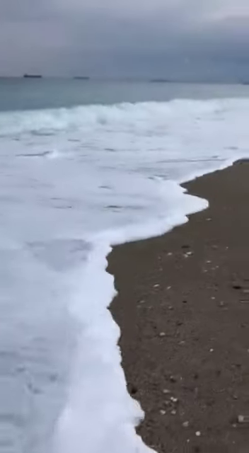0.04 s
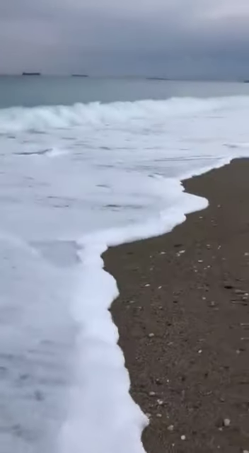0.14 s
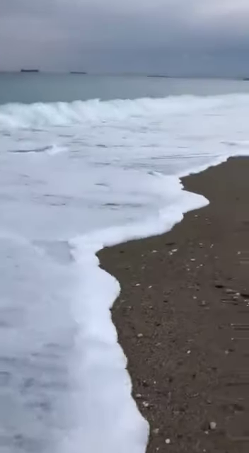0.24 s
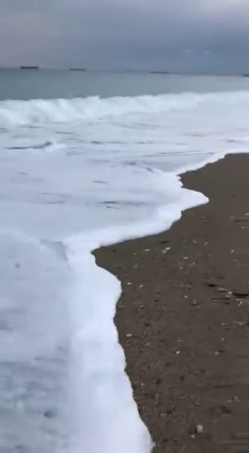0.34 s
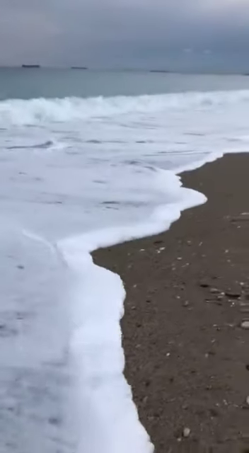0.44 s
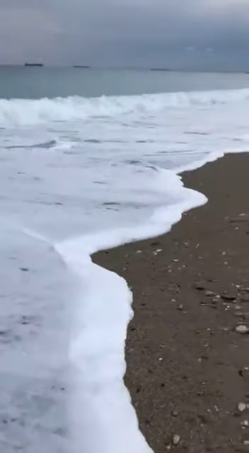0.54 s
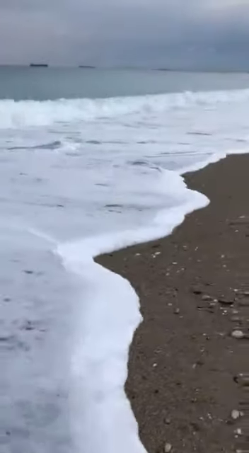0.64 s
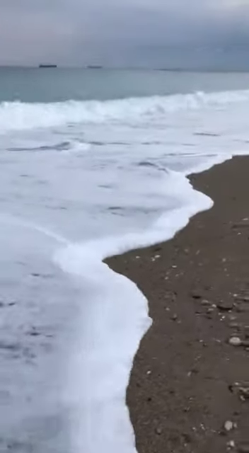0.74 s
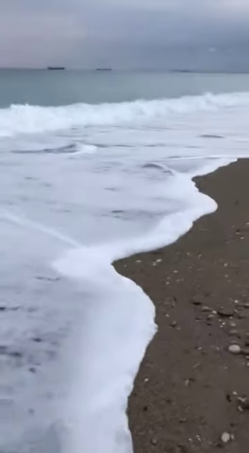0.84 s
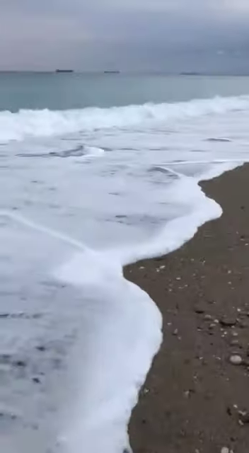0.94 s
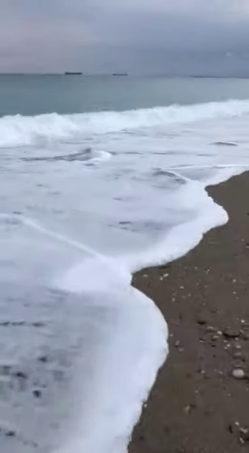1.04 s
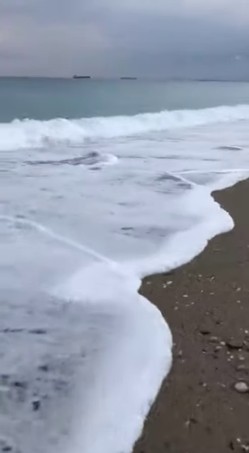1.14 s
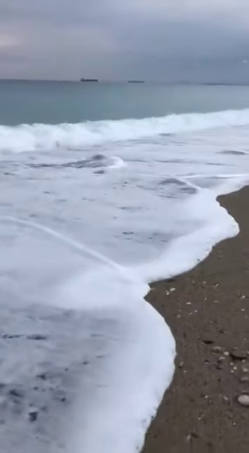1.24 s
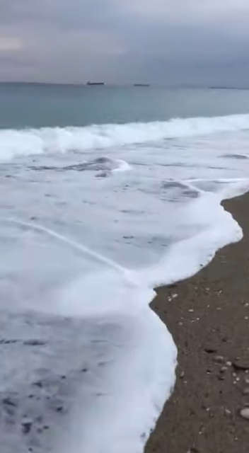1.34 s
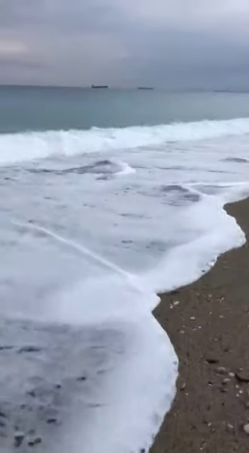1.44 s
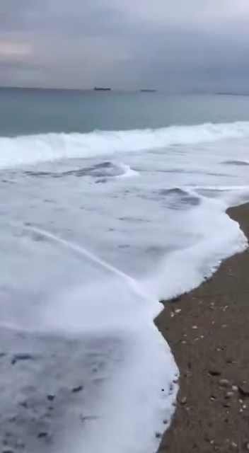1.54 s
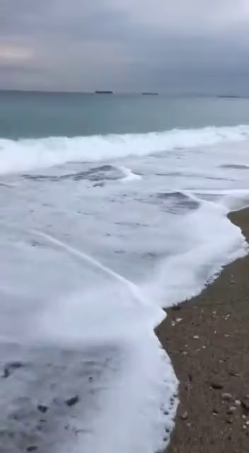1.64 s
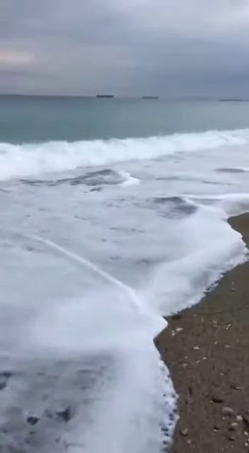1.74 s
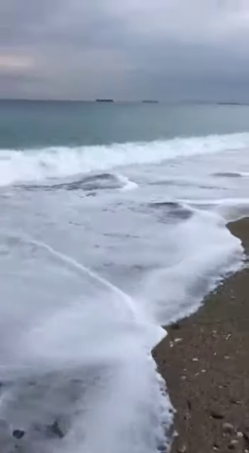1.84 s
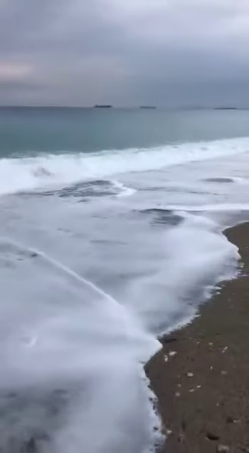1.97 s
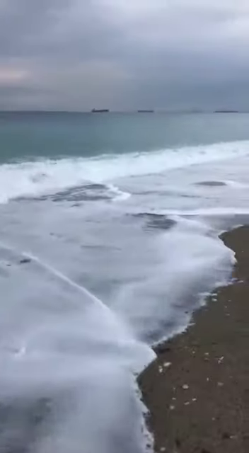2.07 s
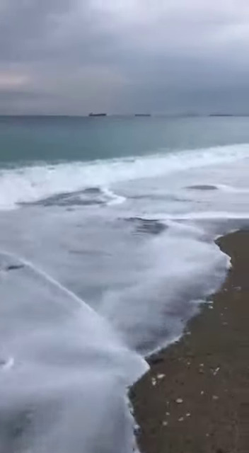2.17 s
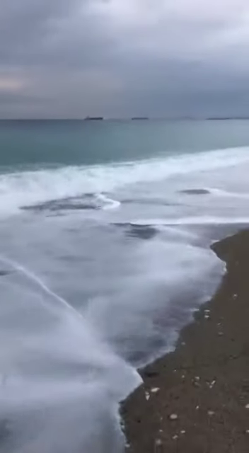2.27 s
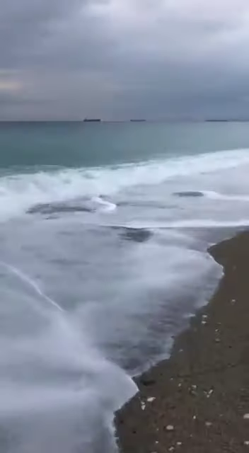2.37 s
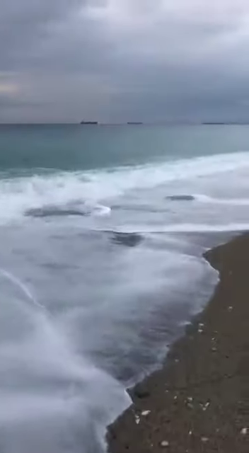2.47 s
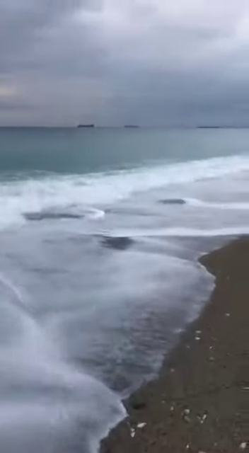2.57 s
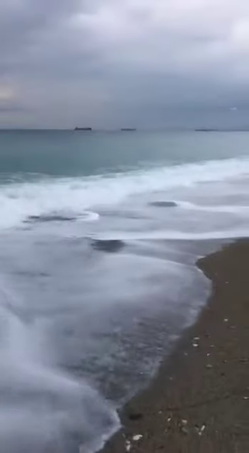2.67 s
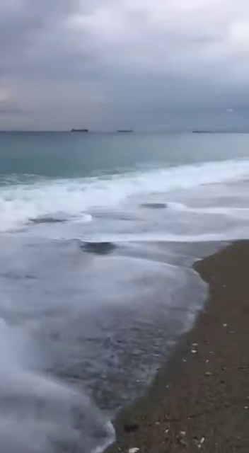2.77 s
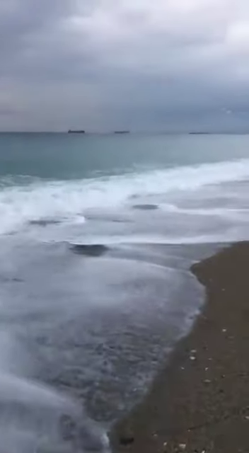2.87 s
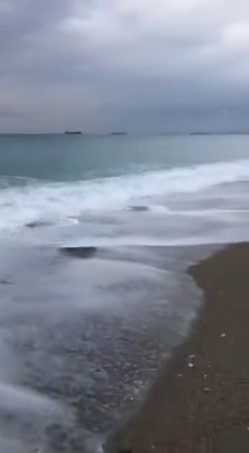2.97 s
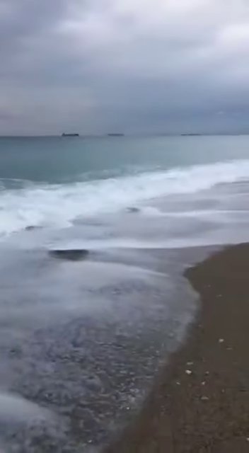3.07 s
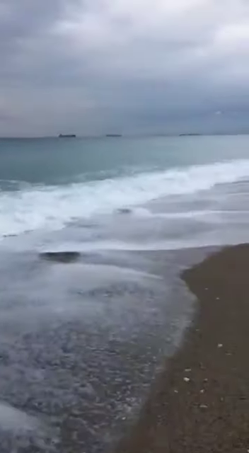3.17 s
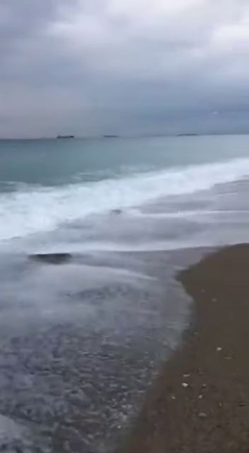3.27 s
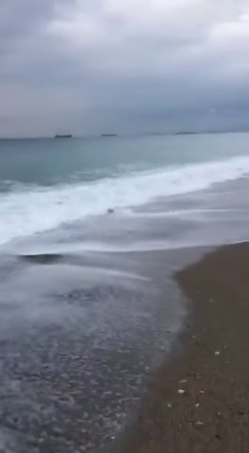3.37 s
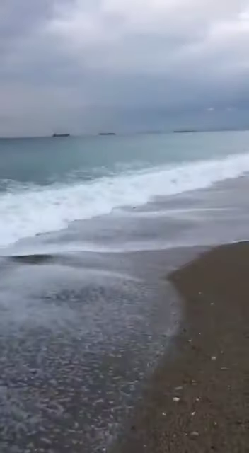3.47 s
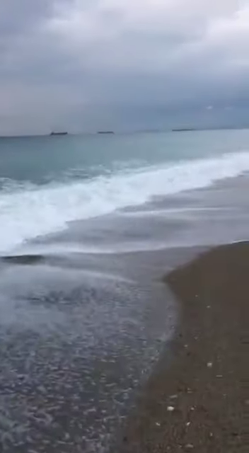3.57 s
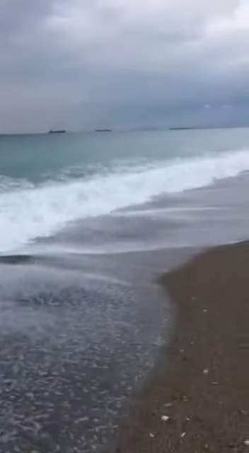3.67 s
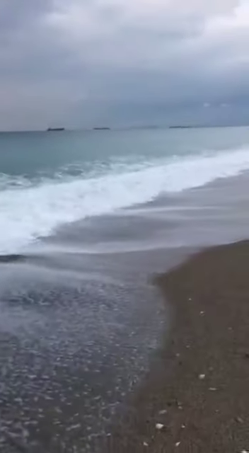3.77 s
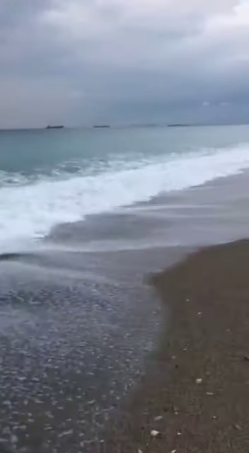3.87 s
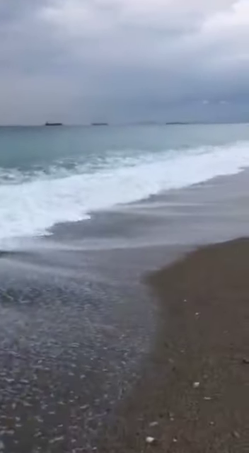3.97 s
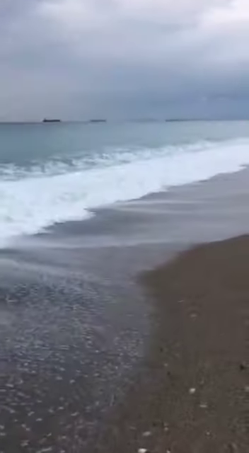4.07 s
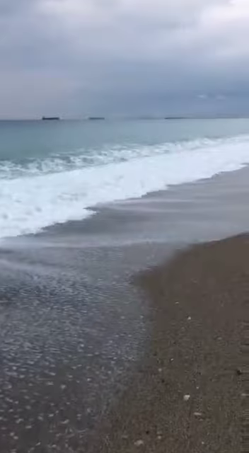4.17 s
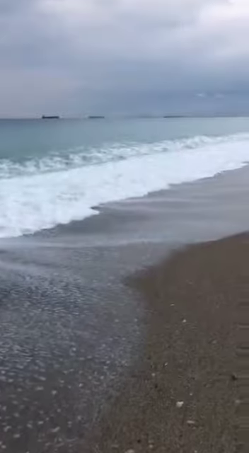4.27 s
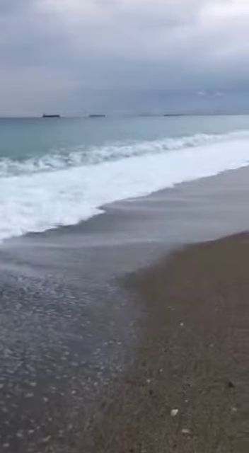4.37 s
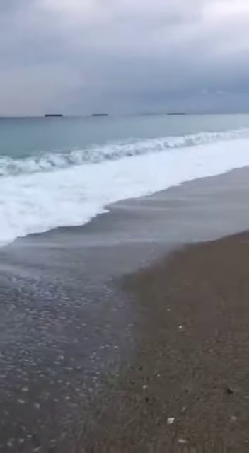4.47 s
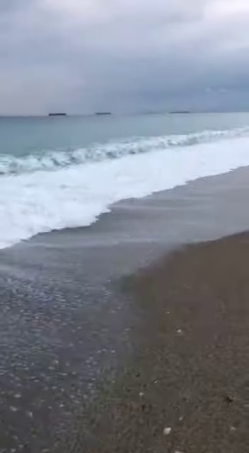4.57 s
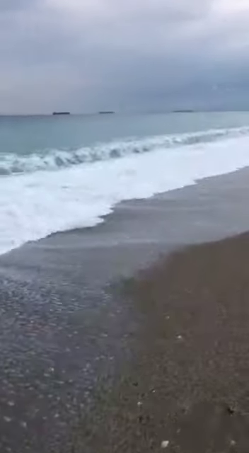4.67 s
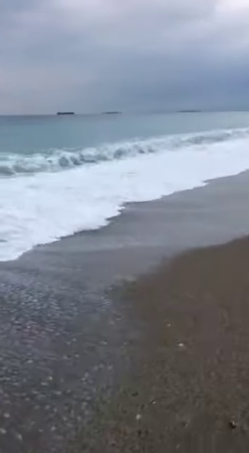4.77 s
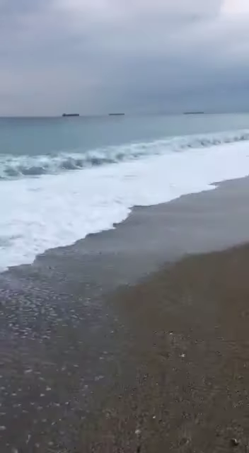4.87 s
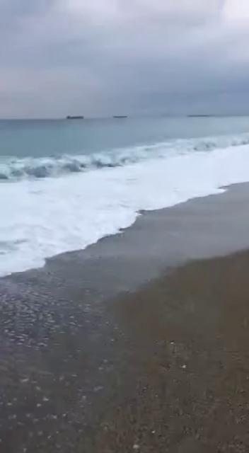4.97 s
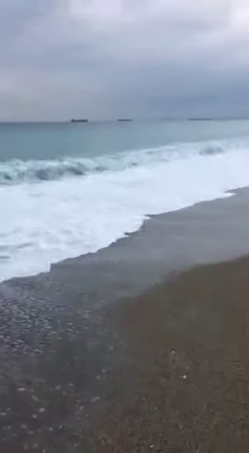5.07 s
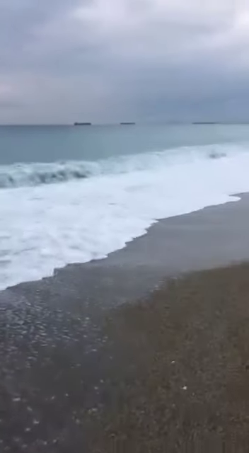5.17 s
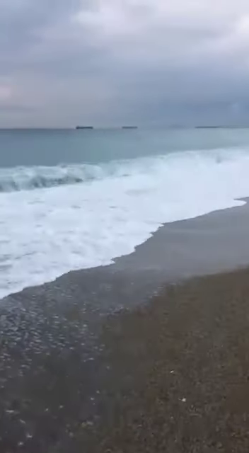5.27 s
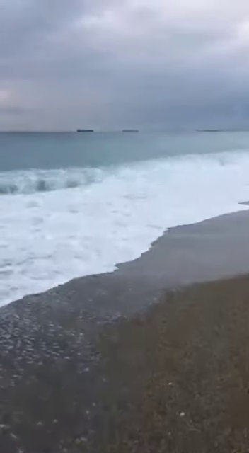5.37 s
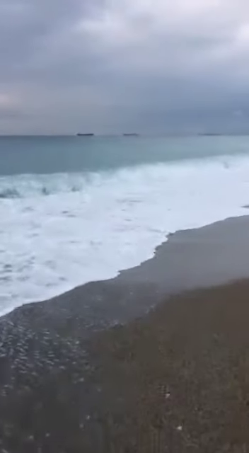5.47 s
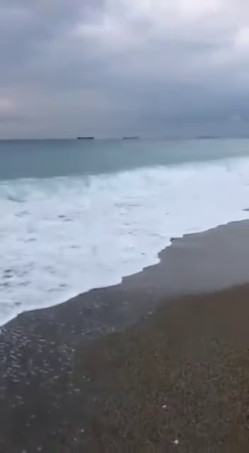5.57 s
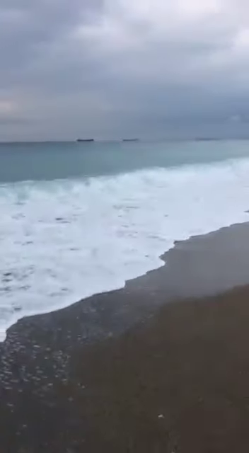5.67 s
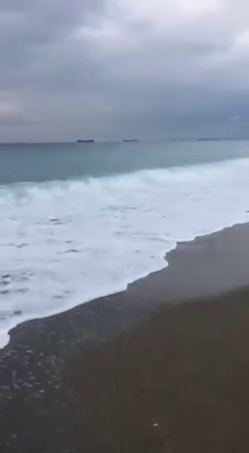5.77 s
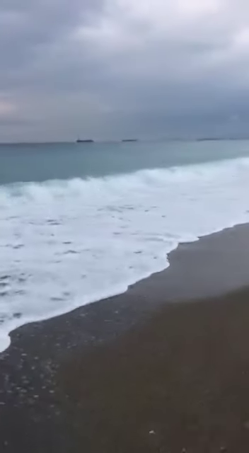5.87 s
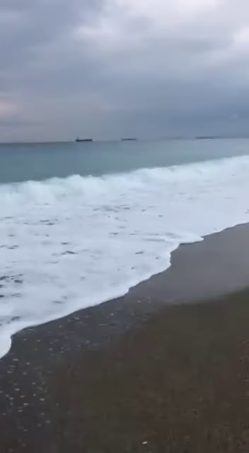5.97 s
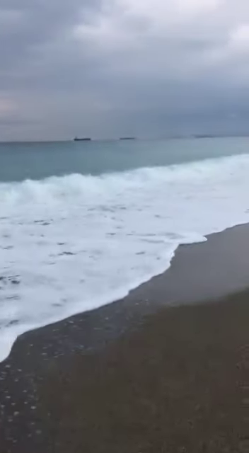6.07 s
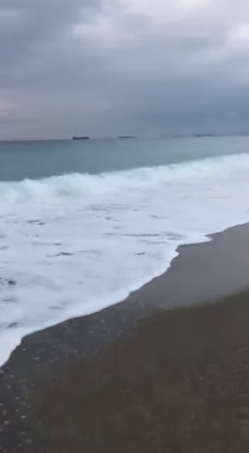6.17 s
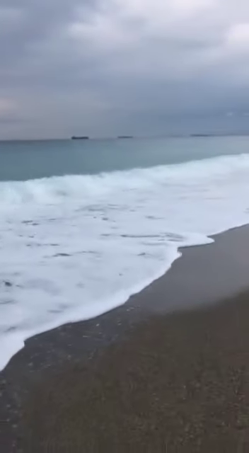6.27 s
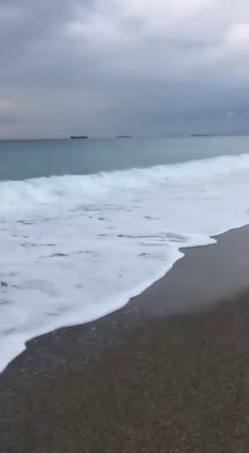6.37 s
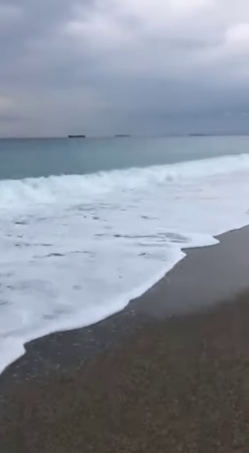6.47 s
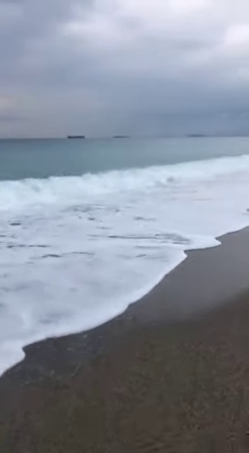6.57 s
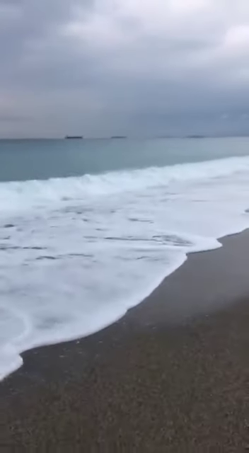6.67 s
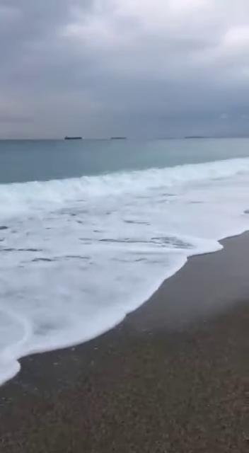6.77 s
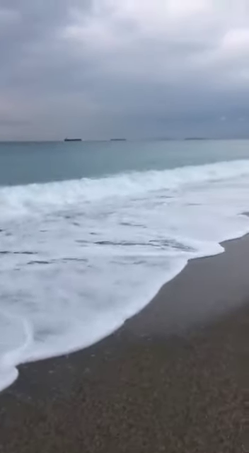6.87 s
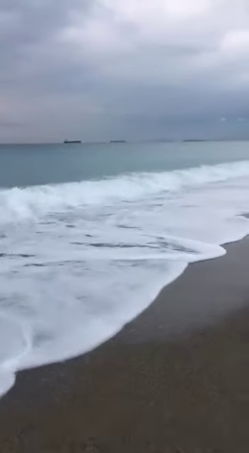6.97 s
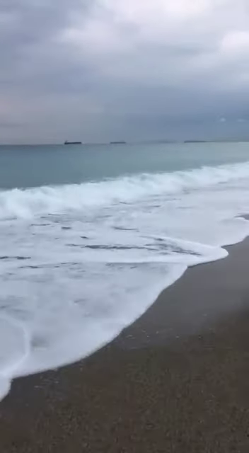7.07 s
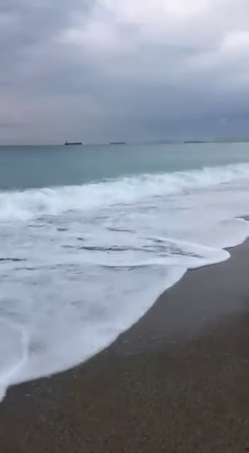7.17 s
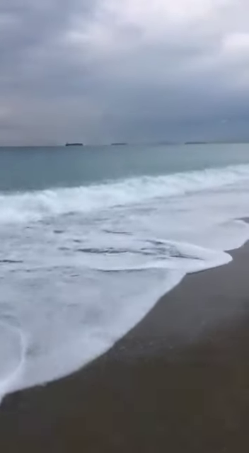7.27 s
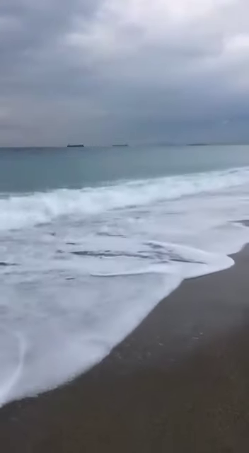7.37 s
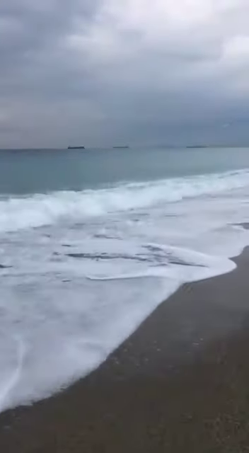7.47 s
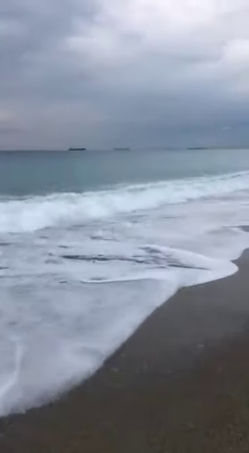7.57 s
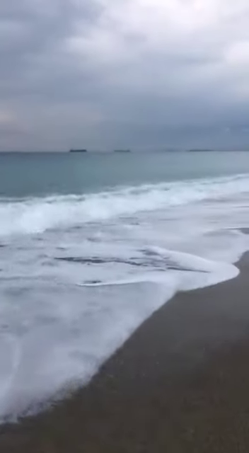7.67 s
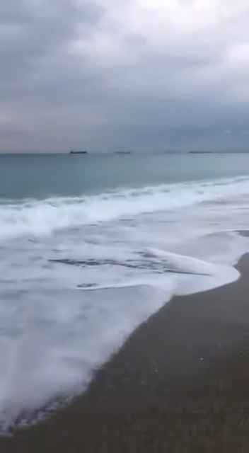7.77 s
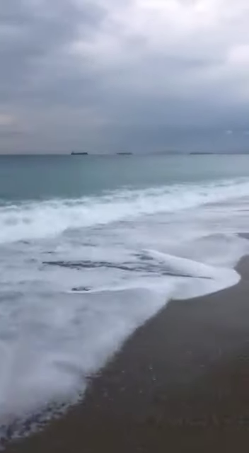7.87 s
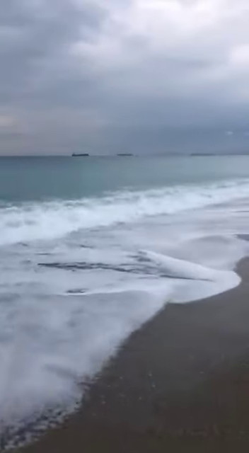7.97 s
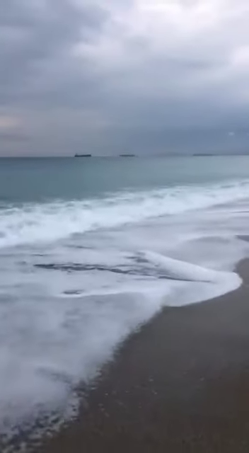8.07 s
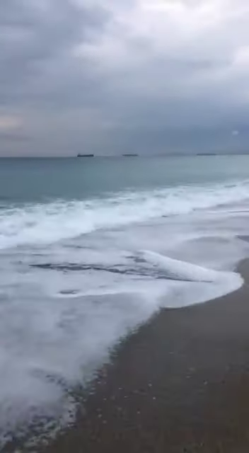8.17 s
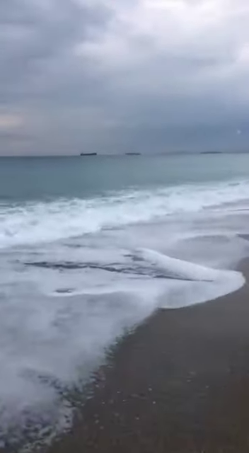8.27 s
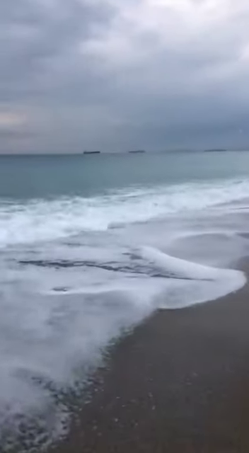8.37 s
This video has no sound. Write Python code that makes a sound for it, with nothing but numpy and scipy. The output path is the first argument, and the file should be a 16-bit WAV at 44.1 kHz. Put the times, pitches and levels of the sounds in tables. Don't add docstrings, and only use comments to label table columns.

```python
import sys
import numpy as np
from scipy import signal
from scipy.fft import rfft, irfft
from scipy.io import wavfile
from scipy.ndimage import uniform_filter1d

SR = 44100
rng = np.random.default_rng(int(sys.argv[2]) if len(sys.argv) > 2 else 0)


def file_out(sig):
    cols = np.atleast_2d(sig).T
    lim = np.clip(cols, -1, 1)
    pcm = np.round(lim * 32767).astype(np.int16)
    wavfile.write(sys.argv[1], SR, pcm)


def volts_from_decibels(level):
    exponent = np.asarray(level, float) / 20
    return 10 ** exponent


N = 371322

# (time [s], level of the fizz [dB])
FOAM_COVER = [(0, -37), (.5, -36.5), (.95, -34.5), (1.2, -39), (1.9, -39), (2.7, -42), (3.5, -44.5),
              (3.85, -43.5), (4.8, -46), (5.3, -45), (5.45, -43), (5.7, -39.5), (5.9, -36), (6.2, -36.5),
              (6.35, -38), (6.8, -37.5), (7.6, -39), (8.42, -40.5)]


def evened(x):
    return x / np.sqrt(np.mean(x ** 2) + 1e-20)


def read(points, hz):
    f, value = np.transpose(points)
    return np.interp(np.log(hz + 1), np.log(f + 1), value)


def along(curve):
    return np.interp(np.arange(N) / SR, *np.transpose(curve))


def behind(x, lag_s):
    r = np.exp(-1 / (lag_s * SR))
    return x[0] + signal.lfilter([1 - r], [1, -r], x - x[0])


def lifts_db(events):
    t = np.arange(N) / SR
    total_db = 0
    for start_s, db, rise_s, decay_s in events:
        onset = np.clip((t - start_s) / rise_s + 1, 0, 1)
        fade = np.exp(-np.maximum(t - start_s, 0) / decay_s)
        total_db = total_db + db * fade * onset
    return total_db


def water(colour, size, patchy_db, flicker_db, tilt=((0, 0), (9, 0)), pivot=5000):
    hop = size // 4
    frames, hz = N // hop + 5, np.fft.rfftfreq(size, 1 / SR)
    real, imaginary, patches = rng.standard_normal((frames, len(hz), 3)).T

    wide, long = max(size // 64, 1), max(4096 // hop, 1)
    patches = uniform_filter1d(patches, wide, 0)
    patches = evened(uniform_filter1d(patches, long, 1))
    flicker = evened(uniform_filter1d(rng.standard_normal(frames), size=5))

    slope = np.interp(np.arange(frames) * hop / SR, *np.transpose(tilt))
    octaves = np.log2(np.maximum(hz / pivot, .3))
    field_db = read(colour, hz)[:, None] + np.outer(octaves, slope)
    field_db = field_db + patchy_db * patches + flicker_db * flicker
    spectra = (real + 1j * imaginary) * volts_from_decibels(field_db)
    return evened(signal.istft(spectra, nperseg=size, noverlap=size - hop)[1][:N])


def breaker():
    # (time [s], level of the roar [dB])
    surf = [(0, -26.5), (.65, -25), (1.1, -24), (1.5, -25.5), (2.2, -26.5), (2.6, -28), (3, -32.5),
            (3.6, -32.5), (4.3, -37), (4.95, -41.5), (5.12, -39), (5.3, -35), (5.85, -29.5), (6.5, -27),
            (7, -28), (7.5, -25), (8, -27.5), (8.42, -29)]
    # (frequency [Hz], level [dB])
    boom_colour = [(18, -54), (24, -42), (32, -31), (45, -14), (65, -2.5), (100, -2), (140, -0.5),
                   (190, -11), (300, -36.5)]
    roar_colour = [(80, -35), (120, -11.5), (150, -2), (195, -0.5), (300, -4), (420, -5.5), (560, -9),
                   (660, -13.5), (850, -41.5)]
    churn_colour = [(450, -52), (620, -5.5), (720, -2.5), (900, -3.5), (1200, -7), (1700, -13), (2300, -19),
                    (3200, -33), (5000, -56)]
    # (time [s], tilt of the roar [dB per octave])
    roar_tilt = [(0, 1.4), (.5, -0.3), (2.1, -0.23), (3.2, 1.6), (3.9, 1.9), (4.6, -0.53), (5.2, 1.3),
                 (5.5, -0.18), (6.3, -0.13), (6.8, -0.84), (8.42, -0.94)]
    # (time [s], gain of the boom [dB], rise [s], decay [s])
    thumps = [
        (1.25, 4, .1, .25),
        (5.5, 1.5, .1, .15),
        (6.65, 1.5, .1, .2),
    ]
    # (time [s], gain of the roar [dB], rise [s], decay [s])
    plunges = [
        (.25, 4, 0.046, 0.045),
        (1.2, -2.5, .03, 0.1),
        (5.2, 1.5, .02, 0.087),
        (6.2, 1, 0.034, 0.053),
    ]
    # (time [s], gain of the churn [dB], rise [s], decay [s])
    sprays = [
        (1.7, 1, 0.27, 0.39),
        (3.5, 3, .25, 0.37),
        (4.15, 2.5, 0.23, .25),
        (5.98, 3.5, .25, 0.11),
        (7.3, 2, .6, 1.5),
    ]

    full_db = -26
    force_db = along(surf) - full_db

    boom_db = -33 + 1.01 * force_db - 0.5 * along(roar_tilt)
    boom_db += 0.47 * np.maximum(force_db - behind(force_db, lag_s=0.43), 0)
    boom = water(boom_colour, size=4096, patchy_db=-0.23, flicker_db=-0.4)
    boom = volts_from_decibels(boom_db + lifts_db(thumps)) * boom

    roar = water(roar_colour, size=1024, patchy_db=-0.08, flicker_db=0.5, tilt=roar_tilt, pivot=287)
    roar = volts_from_decibels(full_db + force_db + lifts_db(plunges)) * roar

    whitewater = volts_from_decibels(-37.5 + 0.94 * behind(force_db, lag_s=0.62))
    foam_churn = volts_from_decibels(along(FOAM_COVER) - 11)
    churn = water(churn_colour, size=512, patchy_db=0.23, flicker_db=0.67)
    churn = np.hypot(whitewater, foam_churn) * volts_from_decibels(lifts_db(sprays)) * churn
    return boom + roar + churn


def bubbles(per_s, low_hz, high_hz, turns, spread_db):
    strength = volts_from_decibels(spread_db * np.minimum(rng.exponential(1, N), 5))
    strength = strength * (rng.random(N) < per_s / SR)
    kind, out = rng.integers(0, 24, N), np.zeros(N)
    for k, hz in enumerate(np.geomspace(low_hz, high_hz, 24)):
        cycles = np.arange(400) / SR * hz
        chirp = np.sin(2 * np.pi * cycles * (1 + 0.0034 * cycles))
        pop = np.exp(-cycles / turns) * chirp * np.minimum(cycles, 1)
        out += signal.oaconvolve(strength * (kind == k), pop)[:N]
    return evened(out)


def foam():
    # (frequency [Hz], level [dB])
    fizz_colour = [(900, -19), (1500, 0.5), (2100, -1), (2600, -3), (3400, 0.5), (4400, -1), (5700, -4.5),
                   (8000, -5.5), (11000, -6.5), (11700, -9.5), (12300, -5), (13000, -40)]
    # (time [s], gain of the fizz [dB], rise [s], decay [s])
    slaps = [
        (.755, 2.5, .02, .025),
        (4.54, 1.5, .01, .04),
        (5.94, 1, 0.06, 0.14),
    ]

    cover_db = along(FOAM_COVER)
    tilt = 0.36 + 0.42 * (cover_db - behind(cover_db, lag_s=0.2))
    tilt_curve = np.transpose([np.arange(N) / SR, tilt])
    hiss = water(fizz_colour, size=512, patchy_db=0.72, flicker_db=0.52, tilt=tilt_curve)
    pops = volts_from_decibels(-10.5) * bubbles(per_s=2500, low_hz=1896, high_hz=10400, turns=6.6, spread_db=3.5)
    return volts_from_decibels(cover_db + 0.24 + lifts_db(slaps)) * (hiss + pops)


def spotty_treble(x, edge_hz, wander_hz):
    # (frequency [Hz], how much strong tones are favoured [exponent])
    spottiness = [(600, 0.015), (1500, 0.088), (3000, .1), (5000, 0.07), (8000, 0.12), (11500, .14)]
    hz, _, z = signal.stft(x, SR, "cosine", nperseg=4096)
    local = np.sqrt(uniform_filter1d(abs(z) ** 2, size=48, axis=0) + 1e-16)
    favour = np.clip(read(spottiness, hz), 0, .5)[:, None]
    z = z * (abs(z) / local + 1e-3) ** favour
    top_hz = edge_hz + wander_hz * rng.standard_normal(z.shape[1])
    return signal.istft(z * (hz[:, None] < top_hz), SR, "cosine", nperseg=4096)[1][:N]


def stray_side(mono):
    count, size = 25, 2048
    side, window, hz = np.zeros(N + size), np.hanning(size), np.fft.rfftfreq(size, 1 / SR)
    for k, (when, where, *turns) in enumerate(rng.random((count, 2 + len(hz)))):
        at = int((k + when) / count * (N - size))
        low_hz = np.interp(where, (0, 1), (4100, 9600))
        in_band = (hz > low_hz) * (hz < low_hz * 1.19)
        band = rfft(mono[at:at + size], size) * in_band
        scrambled = irfft(band * np.exp(2j * np.pi * np.array(turns)))
        side[at:at + size] += volts_from_decibels(-1.0) * window * scrambled
    return side[:N]


def scene():
    return np.tile(breaker() + foam(), (2, 1))


def band_limit(x):
    return signal.sosfilt(signal.butter(12, 12060, fs=SR, output="sos"), x)


def record(dry):
    mono = spotty_treble(dry[0], edge_hz=11790, wander_hz=130)
    mix = mono + np.outer([1, -1], stray_side(mono))
    return band_limit(mix)


dry = scene()
out = record(dry)
file_out(out)
```